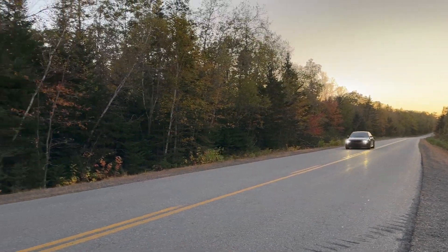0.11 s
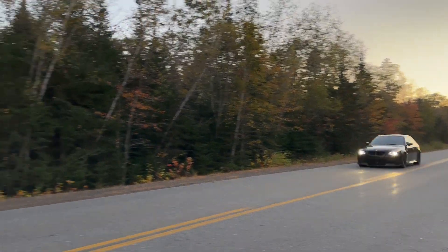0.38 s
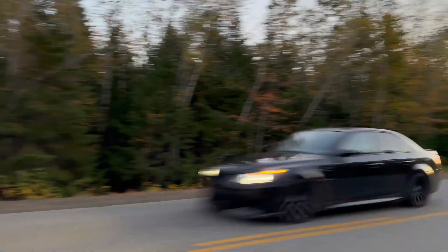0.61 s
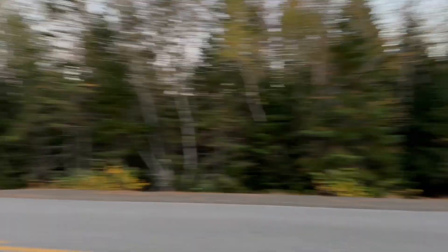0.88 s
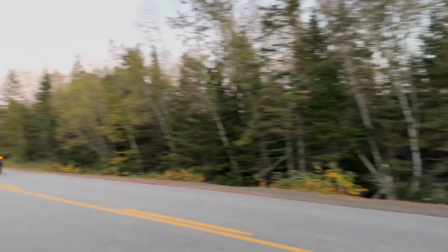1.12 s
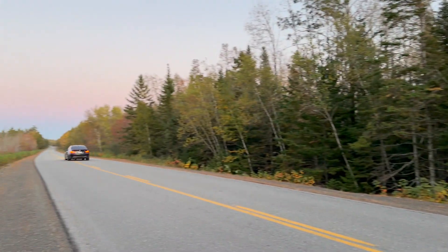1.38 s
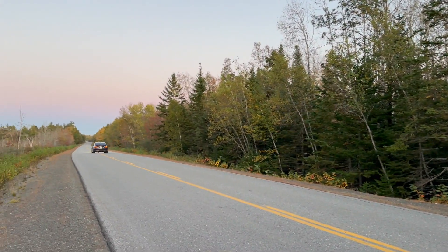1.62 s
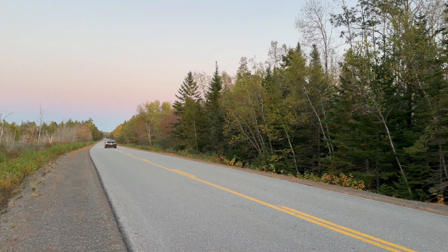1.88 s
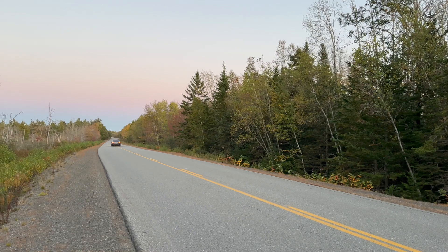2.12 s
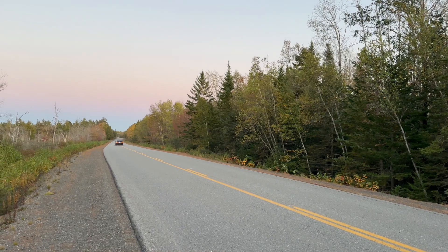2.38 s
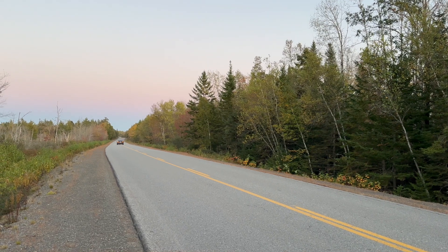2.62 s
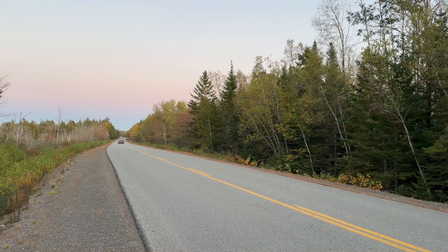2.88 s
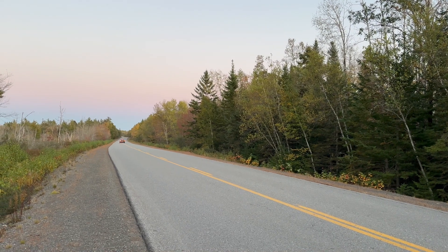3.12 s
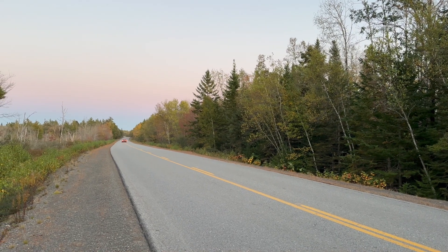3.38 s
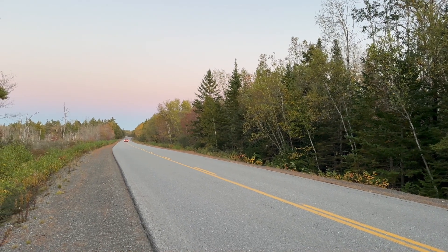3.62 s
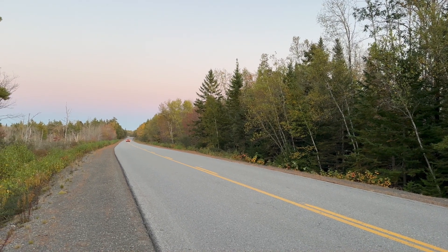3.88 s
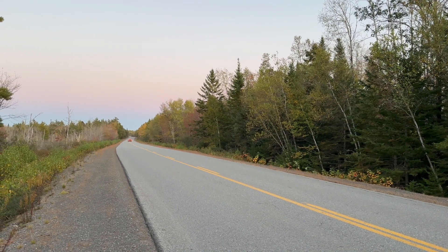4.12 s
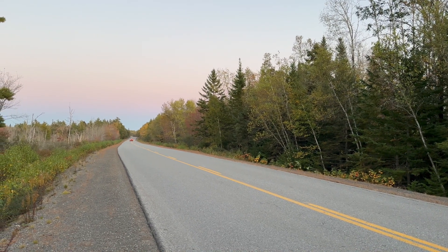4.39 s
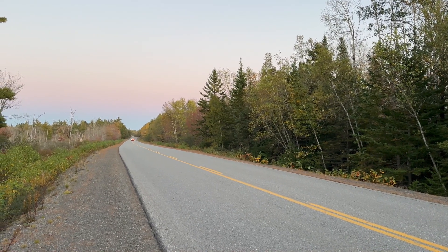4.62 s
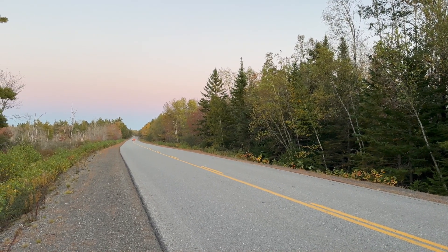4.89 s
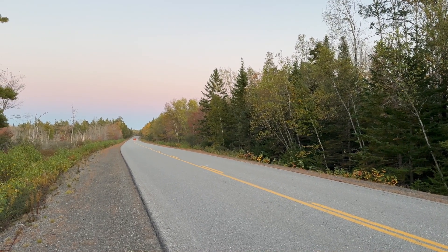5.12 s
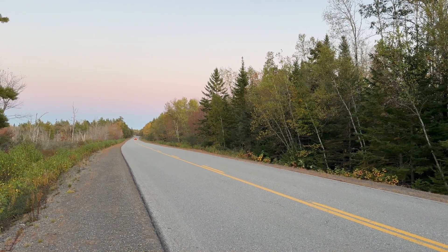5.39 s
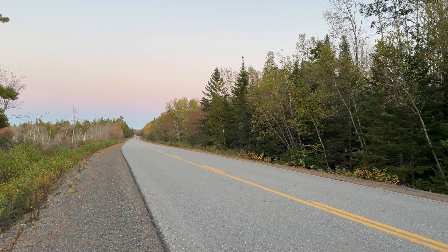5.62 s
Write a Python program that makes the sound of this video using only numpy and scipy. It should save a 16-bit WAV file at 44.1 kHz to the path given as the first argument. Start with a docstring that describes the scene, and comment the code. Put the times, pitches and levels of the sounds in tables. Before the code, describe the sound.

A black sedan screams past at full throttle on a forest road, its high exhaust howl dropping sharply, then pops and coasts into the distance.

```python
"""A forest road: a ten-cylinder car comes down it at full throttle, passes a few metres away and runs off.
Firing harmonics make the engine note, which drops in pitch as the car goes by; far away the engine
stutters, shifts down its load, pops and coasts. Coloured noise makes the pipe roar, tyres, buffeting and hiss.
Sparse echoes come back from the tree line; two close microphone ports listen."""
import sys
import numpy as np
from scipy import signal
from scipy.io import wavfile
from scipy.ndimage import uniform_filter1d, map_coordinates

SR = 44100
rng = np.random.default_rng(int(sys.argv[2]) if len(sys.argv) > 2 else 0)


def file_out(sig):
    """Save sig as 16-bit WAV at sys.argv[1]."""
    # one column per channel
    cols = np.atleast_2d(sig).T
    # limit, then scale
    lim = np.clip(cols, -1, 1)
    pcm = np.round(lim * 32767).astype(np.int16)
    wavfile.write(sys.argv[1], SR, pcm)


def invert_db(level):
    """Linear amplitude ratio for a level in decibels (20 dB per decade), elementwise."""
    return 10 ** (np.asarray(level, dtype=float) / 20)


N = 254016  # samples

# Echo decay off the trees. Each row: frequency in Hz, t60 in seconds.
TREE_T60_S = [(150, 0.19), (600, 1), (2000, 0.55), (8000, 0.3)]
# Echo spectrum. Each row: frequency in Hz, level in dB.
TREE_LEVEL_DB = [(150, -19), (400, -13.5), (1500, -6.5), (5000, -1.5), (9500, 1.5), (12500, -28.5)]
# Noise spectra. Each row: frequency in Hz, relative level in dB per Hz.
TYRE_SPECTRUM_DB = [(150, -27.5), (400, -8), (800, -1.5), (1500, -4), (3000, -16), (6000, -39.5),
                    (10000, -70)]
BUFFET_SPECTRUM_DB = [(20, -25), (50, -9.5), (100, -4.5), (150, 3), (260, -37.5), (600, -89)]
HISS_SPECTRUM_DB = [(1500, -10), (2300, -4.5), (3200, -10), (4500, -15.5), (6500, -16.5), (8000, -25.5),
                    (10000, -22.5), (13000, -27), (16000, -22)]
# Pipe and tyre roar from the front, from behind under load, coasting.
# Each row: frequency in Hz, relative level in dB per Hz.
ROAR_FRONT_DB = [(70, -19), (120, -12), (200, 5), (420, -8), (800, -3), (1200, -1.5), (1900, -12.5),
                 (2500, -12.5), (3300, -17.5), (5280.0, -54.5), (9000, -93)]
ROAR_LOAD_DB = [(70, -41), (120, -9.5), (200, -7.5), (400, -8.5), (650, 6), (900, 0), (1150, -10),
                (1450, -1.5), (1700, -10.5), (2100, -13), (2500, -18), (3300, -20.5), (5280.0, -58.5),
                (9000, -100)]
ROAR_COAST_DB = [(70, -52), (120, -29.5), (170, -11), (280, -5.5), (500, -12), (750, 2), (1000, -9.5),
                 (1200, -18.5), (1500, -11.5), (1800, -22), (2600, -32), (3400, -40), (4400, -53),
                 (5800, -52.5), (7500, -68.5), (12000.0, -120)]
# Fall with distance, one row each for front, load, coasting.
# Each row: level in dB at a softened distance of 10 m, loss in dB per tenfold distance.
HISS_FALL_DB = [(-11, 2), (-1, 24), (27.5, 57)]  # relative to the body
BUFFET_FALL_DB = [(-25, 8.4), (-36, 32), (-33.5, 27)]
# Bangs in the pipe. Each row: time in seconds, level in dB, pitch in Hz.
POPS = [(2.97, -28, 785), (3.012, -25, 750), (3.035, -27, 500), (3.1598, -19, 700), (3.5715, -15.5, 760),
        (3.5955, -19, 700), (3.6187, -22.5, 700), (3.642, -29, 640), (3.666, -24, 640), (3.712, -24, 644),
        (3.743, -27, 700), (3.752, -26, 700), (3.785, -23, 640), (3.832, -26, 700), (3.856, -24.5, 640),
        (3.879, -27, 700), (3.927, -23, 630)]
# Overall course. Each row: time in seconds, body level in dB, exhaust note above the body in dB.
CAR_LEVELS = [(0.0, -18, 1.5), (0.3, -18.5, 0), (0.55, -16.5, -2.5), (0.64, -23.5, 8.5), (0.7, -22.5, 0.5),
              (0.8, -29.5, 10), (0.9, -33, 6.5), (1.05, -35, 4), (1.3, -27, -2.5), (1.6, -28, -0.5),
              (2.1, -28, 1.5), (2.9, -28, 2), (3.1, -30.5, -1.5), (3.22, -32.5, -9), (3.6, -32.5, -3.5),
              (3.8, -36.5, 3), (4.05, -32, 2), (4.6, -32.5, -0.5), (5.76, -34.5, 2)]
# Firing rate at the tailpipe: climbs under load, then a shift and coasting.
# Each row: time in seconds, rate in Hz.
FIRING_HZ = [(0.0, 279.6), (0.5, 284.9), (0.7, 286.1), (0.94, 286.4), (1.38, 288.9), (1.7, 292.6),
             (2.2, 293.8), (2.68, 297.2), (2.88, 296.2), (2.94, 291.5), (3.13, 299.7), (3.2, 289.2),
             (3.5, 257.4), (3.7, 244.9), (3.98, 250.8), (4.04, 248.4), (4.28, 247.7), (5.2, 239.2),
             (5.76, 236.5)]
# Exhaust note. Each row: multiple of the firing rate, level in dB from the front,
# from behind under load, coasting.
HARMONICS = [(.6, -21, -27.5, -38.5), (1, -8.5, -5, -8), (1.6, -15, -35.5, -8.5), (2, -4, -6, -2.5),
             (3, -6.5, 1, 2.5), (4, -6.5, -0.5, -8.5), (5, -7.5, -15.5, -20.5), (6, -14.5, -13.5, -24),
             (7, -16, -12, -23.5), (8, -7.5, -16.5, -57.5), (9, -20.5, -10.5, -58), (10, -22.5, -13, -59),
             (11, -18.5, -14.5, -55), (12, -23.5, -22.5, -56.5), (13, -34, -22.5, -62.5)]
# Orders from uneven cylinders. Each row: multiple of the firing rate, level in dB relative to
# the body from the front, from behind under load, coasting.
UNEVEN_ORDERS = [(.4, -23.5, -38.5, -49.5), (.8, -10, -31, -31.5), (1.2, -38, -24.5, -30.5),
                 (1.4, -43.5, -25.5, -33), (1.8, -9.5, -40.5, -24.5), (2.2, -26.5, -23, -33.5),
                 (2.4, -18, -20, -23.5), (2.6, -27, -21, -25), (2.8, -15, -16.5, -16),
                 (3.2, -13, -20.5, -19.5), (3.4, -22.5, -23.5, -24), (3.6, -18, -25.5, -15),
                 (3.8, -19, -22, -22), (4.2, -23, -29, -29.5), (4.4, -17, -35.5, -31),
                 (4.6, -15, -51.5, -29.5), (4.8, -17, -37, -25), (5.8, -19.5, -24.5, -35),
                 (7.8, -12, -22.5, -41.5)]
# Single harmonics swell or fade. Each row: time in seconds, multiple of the firing rate,
# half length in seconds, change in dB.
SWELLS = [(0.0, 2, 0.091, -14.5), (0.031, 3, 0.11, 1.5), (0.083, 6, 0.09, -13), (0.191, 8, 0.16, 10),
          (0.2, 1, 0.069, -3), (0.295, 6, .08, 5.5), (0.36, 5, .04, -10.5), (0.415, 1.6, .06, -10),
          (0.43, 4, 0.064, -17.5), (0.407, 7, .07, -10.5), (0.502, 1, 0.15, 9.5), (0.479, 9, .06, -3),
          (0.505, 3, 0.081, -7), (0.527, 8, .04, -9.5), (.44, 8, .06, -9), (0.147, 4, .15, 1.5),
          (.12, 5, .12, 1.5), (0.599, 9, 0.043, 13.5), (0.65, 10, 0.027, -11), (0.695, 12, 0.1, -15.5),
          (0.72, 1.6, 0.12, -17.5), (0.672, 8, 0.11, -11), (0.691, 7, 0.024, 9), (0.74, 11, 0.031, -6),
          (0.759, 6, .04, -11.5), (0.764, 9, 0.045, -10.5), (0.758, 10, 0.058, -14.5),
          (0.82, 11, 0.054, -9), (0.826, 10, 0.024, 7), (0.688, 11, 0.037, 3.5), (0.609, 3, 0.067, 8),
          (0.633, 1, .02, -15), (0.666, 2, 0.045, -8), (0.697, 1, 0.031, 10.5), (0.74, 2, .02, 13),
          (0.777, 1, 0.086, 15.5), (0.797, 3, 0.081, -12), (0.8, 4, 0.22, -2), (0.83, 5, 0.018, 1),
          (0.837, 9, 0.04, 9.5), (0.977, 9, 0.0825, 7), (0.863, 10, 0.054, 7.5), (1.07, 2, 0.18, -13.5),
          (0.898, 7, 0.074, 10.5), (0.887, 3, 0.025, 7), (1.04, 12, 0.096, 14), (1.104, 7, 0.16, 17.5),
          (1.1, 1, 0.12, -9), (1.108, 11, 0.16, -12), (1.187, 4, .2, -15.5), (1.449, 3, 0.071, -21),
          (1.451, 9, 0.11, 8), (1.568, 6, 0.22, 13.5), (1.6, 3, 0.16, -15), (1.856, 5, 0.085, -10),
          (1.92, 6, 0.083, 7), (1.5, 8, 0.11, 10), (1.502, 11, 0.15, 10), (1.998, 11, 0.13, 8),
          (2.0, 10, 0.13, 4), (2.3, 8, 0.14, 9.5), (2.305, 7, .2, 0.5), (2.11, 9, 0.089, -10.5),
          (2.302, 6, .25, -6.5), (2.5, 9, 0.078, 8), (2.752, 11, .15, 3.5), (2.76, 10, 0.27, 3.5),
          (2.55, 2, 0.15, -5.5), (2.75, 7, 0.16, 5), (3.001, .6, 0.036, 39), (3.002, 2, 0.06, -6),
          (3.288, .6, 0.19, 22.5), (3.089, 1.6, .07, -20.5), (3.09, 3, 0.075, 6.5), (3.152, 2, 0.23, 12),
          (3.287, 3, 0.14, -12.5), (3.469, 1.6, 0.11, 9.5), (3.624, 3, 0.037, -7), (3.701, 4, 0.23, 7),
          (3.728, 3, 0.035, 1.5), (3.812, 2, .22, -8), (3.883, 1.6, .1, -11), (3.955, 3, 0.11, -7),
          (4.447, 2, 0.32, -18.5)]
# Ignition cuts. Each row: start in seconds, end in seconds, change of the note in dB.
IGNITION_CUTS = [(2.912, 2.923, -7), (2.942, 3.052, -11.5), (3.135, 3.161, -7.5), (3.98, 4.01, -9)]
# Lead of the left port, car coming and car gone. Each row: frequency in Hz, phase in radians.
LEAD_FRONT_RAD = [(20, 0), (150, 0), (340, -.3), (680, -1.15), (1010, -1), (1340, -2.2), (1680, -1.75),
                  (2010, -1.15), (2350, -2), (2680, -1), (3100, -2), (5250, -2.5), (6100, -3), (8000, -2),
                  (10300, -2), (12000, -.9)]
LEAD_BEHIND_RAD = [(20, .1), (170, .1), (250, .3), (500, .7), (760, .8), (1010, 1.65), (1260, 1),
                   (1510, 1.5), (1760, 3), (2020, 1.4), (2750, 1.4), (3300, 1.76), (4500, 4.02),
                   (6200, 5.6), (7600, 10.5), (9000, 14.2), (10300, 15), (12000, 13.3)]
# Left minus right port, car coming and car gone. Each row: frequency in Hz, difference in dB.
SHADE_FRONT_DB = [(60, 2), (110, -1), (340, -3), (680, 1), (1010, -3), (1340, -4.5), (1680, -3),
                  (2010, -7.5), (2350, -5.5), (2680, -8), (3350, 7), (4400, 7), (8120, -1), (15000, 0)]
SHADE_BEHIND_DB = [(170, 0), (300, -1), (500, 4), (1030, 3), (1260, 6.5), (1510, -3), (1760, 2.5),
                   (2020, 5), (2280, -2.5), (2750, -8), (3800, 9), (5200, 3.5), (7000, 0.5)]

PASS_S, LIFT_S = .763, 2.93
SPEED_M_S, KERB_M, SOUND_M_S = 56, 5, 343
NEAR_M = 9  # softens the fall with distance: the car is spread out
AIR_DB_PER_M_KHZ2, GROUND_DB_PER_M_KHZ = .0028, 0.0541
TYRE_DB = -26.5
# triples: front, load, coasting
ROAR_UNDER_DB = [-2.5, -8, -7]  # relative to the body
PATCHY_DB = np.array([2.7, 2, 1.5])  # random patches in the noise
# harmonics flutter; firings differ by chance; one cylinder in five is stronger; all even out close by
FLUTTER_DB, RASP_DB, THROB_DB = np.array([1.6, .8, .6]), np.array([2.2, 1.3, .6]), np.array([1.2, 1.2, .3])
FLUTTER_RAD = np.array([.15, .065, .05])  # per multiple
WAKE_DB, WAKE_RAD = 0.6, .24  # per multiple, at the kerb
PIPE_LAG_RAD = 1.05  # per multiple squared
CUT_EDGE_S, CUT_BODY_SHARE = 0.0054, 0.23
BRIGHT_S, BRIGHT_HALF_S, BRIGHT_DB_PER_KHZ = 0.72, 0.11, 2.2  # the tailpipe swings past
CRACKLE_PER_S, CRACKLE_DB, CRACKLE_HALF_S = 700, -25, .11
CRACKLE_HZ, CRACKLE_DECAY_S = 3400, 0.0002
NOSE_M, NOSE_DB, NOSE_HALF_S, NOSE_HIGHPASS_HZ = 3.5, -5, .16, 1300
TREBLE_EDGES_HZ = (10350, 12350, 15750)  # gap start, gap end, top


def read(points, hz):
    """Reads a spectrum on a log-frequency axis."""
    f, value = np.transpose(points)
    return np.interp(np.log(hz + 1), np.log(f + 1), value)


def curve(rows, t):
    """Interpolates every column of a table at the times t."""
    s, *columns = np.transpose(rows)
    return [np.interp(t, s, c) for c in columns]


def drift(hz, count):
    """Slow random curves through knots of rms 1, hz knots a second."""
    knots = rng.standard_normal((count, int(hz * N / SR) + 5))
    at = np.arange(N) / SR * hz
    return np.array([map_coordinates(k, [at], order=2) for k in knots])


def aspects(t):
    """Shares of the three ways the car is heard: front, behind under load, coasting."""
    behind = 1 / (1 + np.exp(-(t - PASS_S) / .08))
    coasting = 1 / (1 + np.exp(-(t - LIFT_S) / .012))
    return np.array([1 - behind, behind - coasting, coasting])


def distance_m(t):
    """Straight pass at constant speed, KERB_M away at the closest."""
    return np.hypot(KERB_M, SPEED_M_S * (t - PASS_S))


def doppler(t):
    """Pitch factor: seconds of sound sent for each second of sound heard."""
    sent = np.linspace(-1, 7, 20000)
    heard = sent + (distance_m(sent) - KERB_M) / SOUND_M_S
    return np.interp(t, heard, np.gradient(sent, heard))


def falloff_db(rows, t):
    """Level drops with the logarithm of distance, by its own law for each aspect."""
    db, slope = np.transpose(rows) @ aspects(t)
    return db - slope * np.log10(np.hypot(NEAR_M, distance_m(t)) / 10)


def cuts_db(t):
    """Smooth-edged level loss while the ignition is out."""
    return sum(db / 2 * (np.tanh((t - start) / CUT_EDGE_S) - np.tanh((t - end) / CUT_EDGE_S))
               for start, end, db in IGNITION_CUTS)


def body_db(t):
    """Level of the roar and the uneven orders; part of each ignition cut reaches it."""
    return curve(CAR_LEVELS, t)[0] + CUT_BODY_SHARE * cuts_db(t)


def cycle_noise(turns, likeness):
    """Noise laid out along the crank: each engine cycle of five firings partly repeats the one before."""
    fresh = rng.standard_normal((400, 1024))
    cycles = signal.lfilter([np.sqrt(1 - likeness ** 2)], [1, -likeness], fresh, axis=0)
    return cycles.ravel()[(turns / 5 * 1024).astype(int) + 8192]


def coloured(source, field_db, band_hz):
    """Gives a white source a patchy frames-by-bins colour, of power about 1 inside band_hz."""
    hz, t, z = signal.stft(source, SR, nperseg=1024, noverlap=768)
    patches = rng.standard_normal(z.T.shape)
    for axis in (0, 1):
        patches = uniform_filter1d(patches, size=9, axis=axis)
    gain = invert_db(field_db[:z.shape[1]])
    inside = (hz > band_hz[0]) & (hz < band_hz[1])
    gain /= np.sqrt((gain[:, inside] ** 2).sum(1, keepdims=True) / len(hz))
    gain *= invert_db((PATCHY_DB @ aspects(t))[:, None] * patches / patches.std())
    return signal.istft(z * gain.T, nperseg=1024, noverlap=768)[1][:N]


def trees(x):
    """Sparse echoes off trunks, other ones at each port, each band dying at its own speed."""
    taps = np.zeros((2, SR))
    at = np.arange(300, SR - 20, 20) + rng.integers(0, 20, (2, (SR - 301) // 20))
    np.put_along_axis(taps, at, rng.choice([-1., 1.], at.shape), 1)
    hz, t, z = signal.stft(taps, SR, nperseg=256)
    decay = invert_db(-60 * t / read(TREE_T60_S, hz)[:, None])
    norm = np.sqrt((decay ** 2).mean(1, keepdims=True) * SR / 20)
    decay *= invert_db(read(TREE_LEVEL_DB, hz))[:, None] / norm
    echoes = signal.istft(z * decay, SR, nperseg=256)[1]
    return signal.fftconvolve(x[None], echoes, axes=1)[:, :N]


def tyres(t):
    """Wide tyre roar spread along the road: opposite at the two ports, heard only while the car is near."""
    hz = np.fft.rfftfreq(1024, 1 / SR)
    colour_db = read(TYRE_SPECTRUM_DB, hz) + np.zeros((N // 256 + 5, 1))
    roar = coloured(rng.standard_normal(N), colour_db, (300, 3000))
    level_db = TYRE_DB - 11 * ((t - PASS_S + .2) / 0.68) ** 2
    return np.outer([1, -1], roar * invert_db(level_db))


def buffeting(t):
    """Low wind noise that falls with distance."""
    hz = np.fft.rfftfreq(1024, 1 / SR)
    colour_db = read(BUFFET_SPECTRUM_DB, hz) + np.zeros((N // 256 + 5, 1))
    noise = coloured(rng.standard_normal(N), colour_db, (35, 140))
    return noise * invert_db(falloff_db(BUFFET_FALL_DB, t))


def hiss(t, turns):
    """Exhaust hiss that puffs with each firing; air dulls it with distance."""
    frame_s, hz = np.arange(N // 256 + 5) * 256 / SR, np.fft.rfftfreq(1024, 1 / SR)
    lost_db = AIR_DB_PER_M_KHZ2 * distance_m(frame_s)[:, None] * (hz / 1000) ** 2
    noise = coloured(cycle_noise(turns, 0.014), read(HISS_SPECTRUM_DB, hz) - lost_db, (3200, 6500))
    puffs = 1 + 0.29 * np.cos(2 * np.pi * turns)
    return noise * puffs * invert_db(body_db(t) + falloff_db(HISS_FALL_DB, t))


def roar(t, turns):
    """Pipe and tyre roar: noise that half repeats each engine cycle and swells with each firing."""
    frame_s, hz = np.arange(N // 256 + 5) * 256 / SR, np.fft.rfftfreq(1024, 1 / SR)
    spectra_db = np.array([read(c, hz) for c in (ROAR_FRONT_DB, ROAR_LOAD_DB, ROAR_COAST_DB)])
    noise = coloured(cycle_noise(turns, .5), aspects(frame_s).T @ spectra_db, (300, 1500))
    swell = 1 + 0.08 * np.cos(2 * np.pi * turns)
    return noise * swell * invert_db(body_db(t) + ROAR_UNDER_DB @ aspects(t))


def crackle(t):
    """Sparse spits of uneven size ring briefly in the tailpipe's mouth while it points this way."""
    size = invert_db(6.8 * np.minimum(rng.exponential(1, N), 4))
    spits = size * (rng.random(N) < CRACKLE_PER_S / SR) * rng.choice([-1, 1], N)
    u = np.arange(300) / SR
    ring = np.sin(2 * np.pi * CRACKLE_HZ * u) * u / CRACKLE_DECAY_S * np.exp(-u / CRACKLE_DECAY_S)
    facing = np.exp(-((t - BRIGHT_S) / CRACKLE_HALF_S) ** 2)
    return signal.oaconvolve(spits, ring)[:N] * invert_db(CRACKLE_DB) * facing


def pops():
    """Unburnt fuel bangs in the far pipe: a dull knock of one cycle and a short ring on a low thump."""
    out, u = np.zeros(N), np.arange(-600, 600) / SR
    thump = .07 * np.sin(2 * np.pi * 170 * u) * np.exp(-(u / .008) ** 2)
    for s, db, hz in POPS:
        width_cycles = np.where(u < 0, .55, .8)
        knock = np.sin(2 * np.pi * hz * u) * np.exp(-(u * hz / width_cycles) ** 2)
        out[round(s * SR) - 600:][:1200] -= invert_db(db) * (knock + thump)
    return out


def nose(t, note):
    """The engine bay lets out the upper note ahead of the tailpipe, so its pitch drops a little earlier."""
    highpass = signal.butter(4, NOSE_HIGHPASS_HZ, "high", fs=SR, output="sos")
    upper = signal.sosfilt(highpass, note)
    late_s = (distance_m(t + NOSE_M / SPEED_M_S) - distance_m(t)) / SOUND_M_S
    level = np.exp(-((t - PASS_S) / NOSE_HALF_S) ** 2)
    return np.interp(t - late_s, t, upper) * invert_db(NOSE_DB) * level


def note_levels_db(t):
    """Level of each harmonic: aspect, brightness, loss over the road, swells and ignition cuts."""
    base_db, note_db = curve(CAR_LEVELS, t)
    orders = np.array(HARMONICS)[:, 0]
    khz = np.outer(orders, curve(FIRING_HZ, t)[0]) / 1000
    tilt_db = BRIGHT_DB_PER_KHZ * np.exp(-((t - BRIGHT_S) / BRIGHT_HALF_S) ** 2)
    tilt_db -= GROUND_DB_PER_M_KHZ * distance_m(np.minimum(t, LIFT_S))  # held after the lift
    levels = base_db + note_db + cuts_db(t) + np.array(HARMONICS)[:, 1:] @ aspects(t) + tilt_db * khz
    for s, k, half_s, db in SWELLS:
        levels[np.argmin(abs(orders - k))] += db * np.exp(-((t - s) / half_s) ** 2)
    return orders, levels


def uneven_cylinders(t, turns):
    """Weaker orders from uneven cylinders, each slowly fading and wandering in phase."""
    out, share, base_db = np.zeros(N), aspects(t), body_db(t)
    fades, starts = drift(9, count=len(UNEVEN_ORDERS)), rng.random(len(UNEVEN_ORDERS))
    for (k, *db), fade, start in zip(UNEVEN_ORDERS, fades, starts):
        level = invert_db(base_db + db @ share + 2.2 * fade)
        out += level * np.cos(2 * np.pi * (k * turns + start) + .45 * fade)
    return out


def engine(t, turns):
    """Firing harmonics whose phase lags make each firing a ringing pulse of uneven strength."""
    orders, levels_db = note_levels_db(t)
    count, share = len(orders), aspects(t)
    near = KERB_M / distance_m(t)
    air, paths = drift(25, count), drift(1.442, count)  # moving air, changing echo paths
    wake = drift(45, count)  # the car's own wake breaks up the upper harmonics
    low = np.minimum(orders, 2.5)
    lags = np.pi + PIPE_LAG_RAD * low * (2 * orders - low)  # the pipe holds back the upper harmonics
    flutter_db, flutter_rad = FLUTTER_DB @ share * (1 - near), FLUTTER_RAD @ share
    out = np.zeros(N)
    for k, db, lag, a, w, p in zip(orders, levels_db, lags, air, wake, paths):
        level = invert_db(db + flutter_db * a + WAKE_DB * k * near * w)
        wander = flutter_rad * k * a + WAKE_RAD * k * near * w + 0.5 * p
        out += level * np.cos(2 * np.pi * k * turns - lag + wander)
    rasp_db = RASP_DB @ share * drift(160, count=1)[0]
    throb_db = THROB_DB @ share * np.cos(2 * np.pi * turns / 5)
    out *= invert_db((1 - near) * (rasp_db + throb_db))
    return np.sqrt(2) * (out + uneven_cylinders(t, turns))


def ports(x):
    """Each port hears the car with its own lead and shading, which turn over as the car goes by."""
    hz, t, z = signal.stft(x, SR, nperseg=512, noverlap=384)
    front = 1 / (1 + np.exp((t - .74) / .025))  # the microphone swings round after the car
    lead_rad = np.outer(read(LEAD_FRONT_RAD, hz), front) + np.outer(read(LEAD_BEHIND_RAD, hz), 1 - front)
    shade_db = np.outer(read(SHADE_FRONT_DB, hz), front) + np.outer(read(SHADE_BEHIND_DB, hz), 1 - front)
    half = invert_db(shade_db / 2) * np.exp(.5j * lead_rad)
    return signal.istft(np.array([z * half, z / half]), SR, nperseg=512, noverlap=384)[1][:, :N]


def scene():
    """Direct sound at the two ports, the spread tyre roar and echoes from the tree line."""
    t = np.arange(N) / SR
    turns = np.cumsum(curve(FIRING_HZ, t)[0] * doppler(t)) / SR  # counted in firings
    note = engine(t, turns)
    rush = buffeting(t) + hiss(t, turns) + roar(t, turns)
    car = rush + crackle(t) + pops() + nose(t, note) + note
    return trees(car) + tyres(t) + ports(car)


def roll_off(x):
    """The treble ends steeply here."""
    return signal.sosfilt(signal.butter(12, 15830, fs=SR, output="sos"), x)


def record(dry):
    """Bass roll-off, soft overload on the loudest pulses, a gap and an end in the high treble."""
    thin = signal.sosfilt(signal.butter(3, 45, "high", fs=SR, output="sos"), dry)
    squeezed = 1.05 * np.tanh(thin / 1.05)
    gap = signal.firwin(801, TREBLE_EDGES_HZ, window=("kaiser", 9), fs=SR)
    mix = signal.oaconvolve(squeezed, gap[None], "same")
    return roll_off(mix)


dry = scene()
out = record(dry)
file_out(out)
```